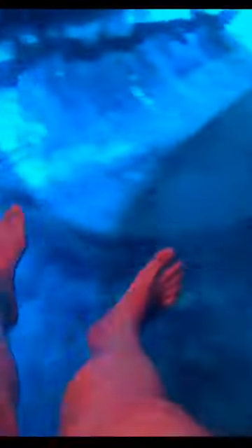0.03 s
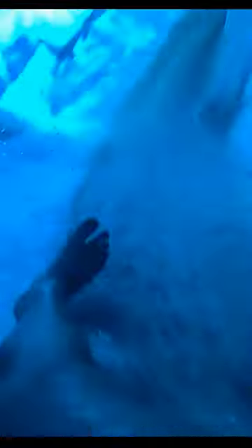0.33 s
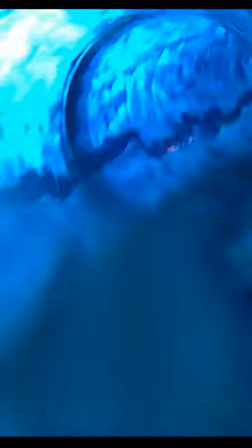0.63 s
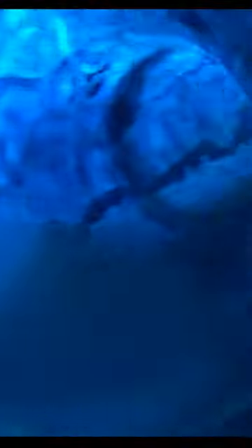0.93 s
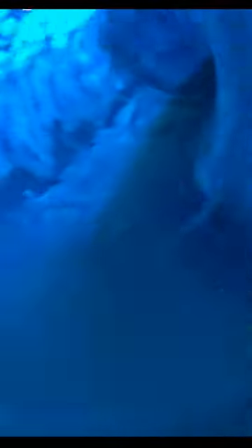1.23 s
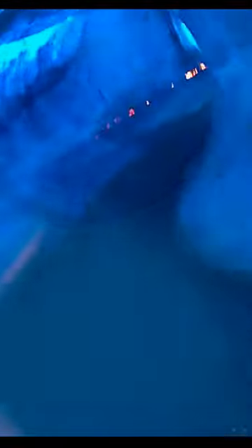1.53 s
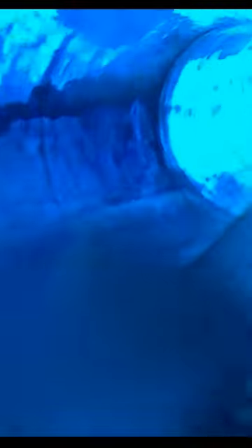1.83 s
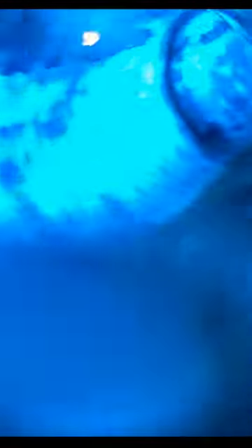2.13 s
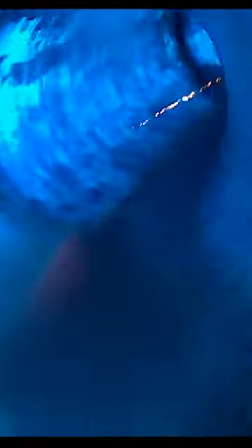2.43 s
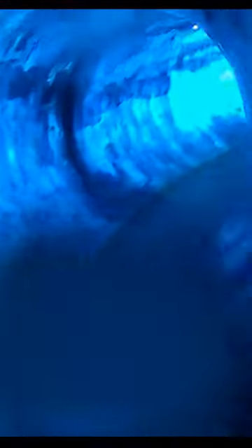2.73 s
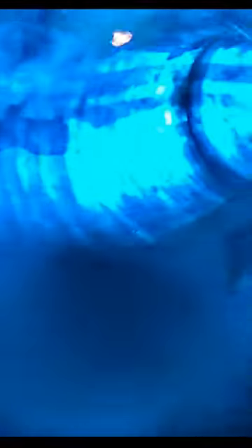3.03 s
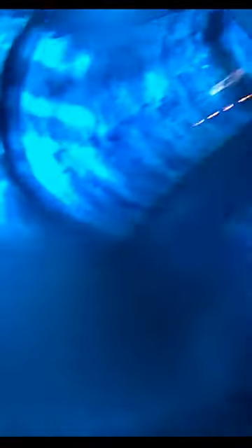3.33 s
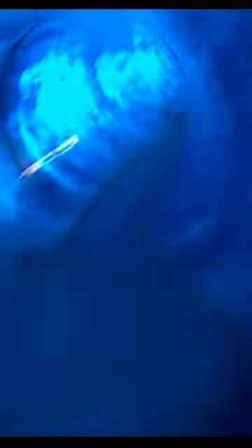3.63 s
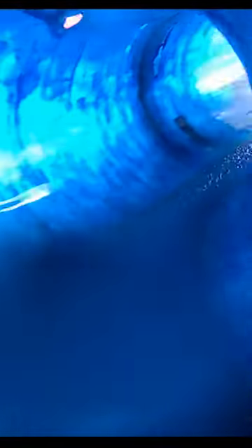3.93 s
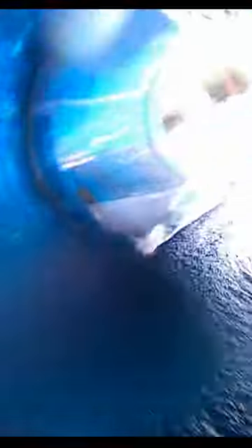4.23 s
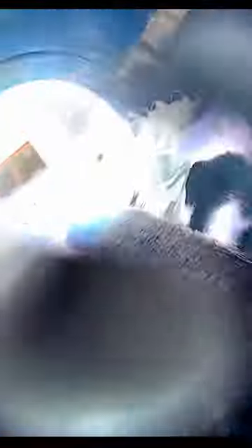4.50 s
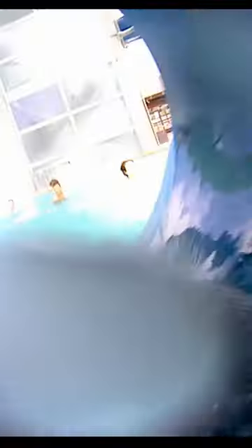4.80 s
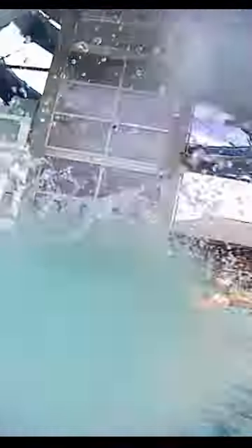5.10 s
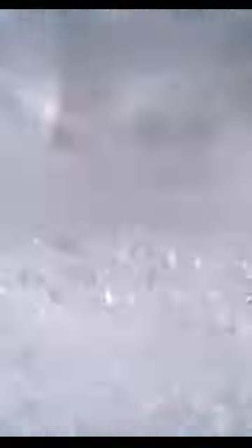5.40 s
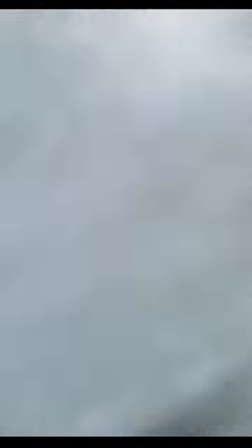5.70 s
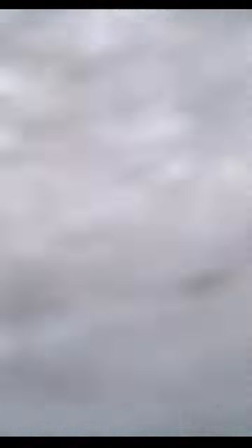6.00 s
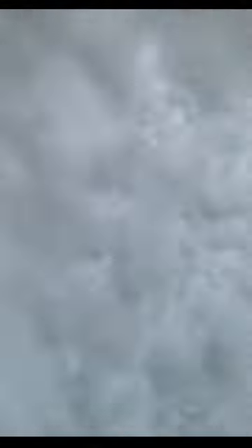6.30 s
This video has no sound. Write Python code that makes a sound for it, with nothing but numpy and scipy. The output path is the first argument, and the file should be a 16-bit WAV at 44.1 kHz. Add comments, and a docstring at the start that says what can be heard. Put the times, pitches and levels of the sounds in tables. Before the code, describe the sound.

From a microphone sealed in a watertight case at a rider's side, faint running water swells and sloshes through a tube slide, over a low rumble and occasional dull knocks. Drops spatter sharply on the case near the end. Then comes a far louder, slightly distorted plunge into a pool, as sheets of water slap the case, followed by fizzing foam, deep gurgling and close plopping bubbles. The treble is muffled throughout.

```python
"""Water hisses along a tube slide, heard at the rider's side from a camera in a watertight case.
The rider bumps along the wall, and drops tick on the case, thickest in the spray near the exit.
Then the plunge into the pool: sheets of water slam the case and overload the microphone inside,
foam fizzes all round it, and air dragged under water gurgles and plops close by."""
import sys
import numpy as np
from scipy import signal
from scipy.fft import rfft, irfft
from scipy.io import wavfile

SR = 44100
rng = np.random.default_rng(int(sys.argv[2]) if len(sys.argv) > 2 else 0)


def store_pcm(level_fs):
    """Save levels as 16-bit WAV."""
    pcm = np.round(np.clip(level_fs, -1, 1) * 32767).astype(np.int16)
    wavfile.write(sys.argv[1], SR, np.atleast_2d(pcm).T)


N = 288855
T = np.arange(N) / SR

# Bumps against the tube wall. Each row: time in seconds, peak in dB.
WALL_BUMPS = [(.2, -47), (0.632, -42), (1.039, -43), (1.462, -44.5), (1.67, -61), (1.905, -51.5),
              (2.03, -49), (2.8, -49), (3.229, -50), (4.122, -52)]
# The spectrum of a drop on the case. Each row: frequency in Hz, relative level in dB.
TAP_SPECTRUM = [(40, -28.5), (300, 0.5), (800, -3.5), (1300, 3.5), (1900, 2), (2700, -4), (3700, -7),
                (4400, -26)]
# The pool closes round the camera, at the surface and then right under. Each row: start in seconds,
# foam in dB, its fade in dB per second, gurgle in dB, its fade in dB per second (negative grows).
POOL_PLUNGES = [(5.259, -22, 31.5, -21.5, 38), (5.83, -17, 17.5, -19, -4)]
UNDER_S, CLOSE_S = 5.83, 0.025  # when the camera is dragged under; how long the water takes to close


def gain_of(db):
    """Decibels to amplitude."""
    return 10 ** (np.asarray(db) / 20)


def unit_rms(x):
    """Scales to an rms of one."""
    return x / np.sqrt(np.mean(x ** 2) + 1e-20)


def add(mix, start_s, sound):
    """Mixes a sound in from start_s on."""
    part = mix[max(round(start_s * SR), 0):][:len(sound)]
    part += sound[:len(part)]


def follow(curve):
    """The gain at every sample along a curve of seconds and dB."""
    return gain_of(np.interp(T, *np.transpose(curve)))


def colour(spectrum, modes=(), size=8192):
    """Minimum-phase impulse response of a spectrum with resonant lifts, heard inside the case."""
    hz = abs(np.fft.fftfreq(size, 1 / SR))
    point_hz, point_db = np.transpose(spectrum)
    db = np.interp(np.log(hz + 1), np.log(point_hz + 1), point_db)
    for centre, width, lift in modes:
        db += lift / (1 + (2 * (hz - centre) / width) ** 2)
    db -= np.clip((hz - 4500) / 25, 0, 60)  # the sealed case shuts out high treble
    log_response = np.conj(signal.hilbert(np.log(gain_of(db))))
    return np.fft.ifft(np.exp(log_response)).real[:size // 2]


def water(response, per_s, spread_db, smooth):
    """Countless small impacts of uneven size over a smooth wash, in one colour; rms one."""
    sizes = gain_of(spread_db * np.minimum(rng.exponential(1, N), 4)) * rng.choice([-1, 1], N)
    impacts = unit_rms(sizes * (rng.random(N) < per_s / SR))
    wash = smooth * rng.standard_normal(N)
    return unit_rms(signal.oaconvolve(impacts + wash, response)[:N])


def waver(per_s, depth_db):
    """A gain that wanders at random."""
    relative_rate = np.fft.rfftfreq(N, 1 / SR) / per_s
    drift = irfft(rfft(rng.standard_normal(N)) / (1 + relative_rate ** 4), N)
    return gain_of(depth_db * unit_rms(drift))


def tube_stream():
    """Running water hisses, patters and sloshes right against the ringing, shaking case."""
    # The stream swelling in the bends, its run-out into the pool, and the shaking of the carried case.
    # Each row: time in seconds, level in dB.
    rush = [(0, -53.5), (.25, -50), (.48, -49), (.75, -50), (1.09, -49), (1.18, -54.5), (1.43, -54),
            (1.75, -50.5), (2.04, -50.5), (2.15, -55.5), (2.47, -55), (2.85, -49.5), (2.94, -54.5),
            (3.05, -52.5), (3.3, -56), (3.85, -55), (4.2, -55), (4.47, -60.5)]
    runout = [(4.58, -57), (4.78, -50), (4.82, -44), (4.97, -43.5), (5.15, -39.5), (5.25, -35.5),
              (5.3, -26.5), (5.68, -31), (5.82, -24)]
    rumble = [(0, -54), (2.2, -55), (2.6, -59.5), (3.7, -61), (4.5, -60), (5.03, -56), (5.15, -41)]
    # Spectra of the hiss, slosh and shaking. Each row: frequency in Hz, relative level in dB.
    hiss_spectrum = [(200, -35.5), (600, -12.5), (1000, -6), (1250, -1.5), (1600, -5.5), (2200, -4.5),
                     (2700, -11.5), (3800, -14.5), (4400, -21.5)]
    slosh_spectrum = [(60, -5.5), (120, 1), (210, -1), (350, -5), (500, -4), (800, -5), (1100, -11.5),
                      (2000, -30)]
    shake_spectrum = [(8, -20.5), (22, 4.5), (40, -4), (70, -16), (120, -20.5), (300, -36), (1000, -98.5)]
    # Resonances of the case. Each row: centre in Hz, width in Hz, lift in dB.
    case_modes = [(1314, 170, 8), (1757, 150, 5.5), (2075, 47, 6.5), (3074, 56, 7), (3540, 710, 4)]
    spray_s, spray_rise_s = 4.95, 0.084  # the rider bursts out into flying spray
    swash_peak_s, drown_db_per_s = 0.06, 76
    spray = np.clip((T - spray_s) / spray_rise_s, 0, 1) * (T < POOL_PLUNGES[0][0] + CLOSE_S)
    ages = np.array([np.maximum(T - s, 0) / swash_peak_s for s, _ in WALL_BUMPS])
    swash = (ages * np.exp(1 - ages)).max(0)  # each bump throws the water about
    hiss = water(colour(hiss_spectrum, case_modes), per_s=2500, spread_db=3, smooth=1)
    hiss *= gain_of(-0.85) * waver(per_s=17, depth_db=1.24)
    patter = water(colour(TAP_SPECTRUM), per_s=90, spread_db=3, smooth=0)
    patter *= gain_of(-14.5 + 6.5 * spray)
    slosh = water(colour(slosh_spectrum), per_s=600, spread_db=4.5, smooth=1)
    slosh *= gain_of(-12.5 + 3 * swash + 4 * spray)
    shake = follow(rumble) * water(colour(shake_spectrum), per_s=150, spread_db=8, smooth=1.1)
    drowned = gain_of(-drown_db_per_s * np.maximum(T - UNDER_S, 0))  # all fades once under water
    return drowned * (follow(rush + runout) * (hiss + patter + slosh) + shake)


def swing(centre_s, db, hz):
    """One swing of pressure, up and then down."""
    phase = np.clip(2 * np.pi * hz * (T - centre_s), -8, 8)
    return -gain_of(db) * phase * np.exp((1 - phase ** 2) / 2)


def thumps():
    """The wall of the tube bumps the case, and later the pool shoves it."""
    # Dull pushes of the pool. Each row: time in seconds, peak in dB, frequency in Hz.
    shoves = [(5.295, -14.5, 45), (5.335, -16, 40), (5.555, -9, 44), (5.7142, -5.5, 48.4), (5.769, -7, 80),
              (5.79, -11.5, 55), (5.88, -9, 60), (5.951, -6.5, 54), (6.259, -14, 100), (6.418, -15.5, 130)]
    wall = sum(swing(s, db, hz=34.2) for s, db in WALL_BUMPS)
    return wall + sum(swing(*shove) for shove in shoves)


def drops():
    """Each drop ticks on the case, right by the microphone, and spatters for a few milliseconds."""
    # The largest single drops. Each row: start in seconds, peak in dB.
    landings = [(0.371, -33.5), (0.4566, -30), (0.5013, -31.5), (1.059, -37), (1.724, -36), (2.0358, -32.5),
                (3.02, -39.5), (3.46, -44), (3.627, -43), (5.0269, -19), (5.043, -19.5), (5.079, -21.5),
                (5.085, -23), (5.1085, -22.5), (5.134, -25), (5.1579, -17), (5.179, -18.5)]
    out, t = np.zeros(N), np.arange(800) / SR
    tap = colour(TAP_SPECTRUM)
    for start_s, db in landings:
        hit = 0.17 * rng.standard_normal(len(t)) * np.exp(-t / 0.003)
        hit[0] = 1  # the impact, ahead of its spatter
        tick = signal.fftconvolve(hit, tap)
        add(out, start_s, gain_of(db) * tick / abs(tick).max())
    return out


def surge(start_s, db, fade_db_per_s):
    """A gain that swells as the water closes, then changes at a steady rate in dB."""
    age = np.maximum(T - start_s, 0)
    return np.minimum(age / CLOSE_S, 1) * gain_of(db - fade_db_per_s * age)


def pool():
    """At each plunge foam fizzes round the case while air dragged under breaks into gurgling bubbles."""
    # Spectra of the foam and the gurgle. Each row: frequency in Hz, relative level in dB.
    foam_spectrum = [(200, -29.5), (700, -2), (1250, 3.5), (1550, -0.5), (1900, 5.5), (2600, -6.5),
                     (3600, -7.5), (4400, -28)]
    gurgle_spectrum = [(12, -40), (35, -5.5), (110, 5), (250, -1), (450, -5.5), (720, -4), (1000, -12.5),
                       (1600, -31.5), (4000, -56.5)]
    foam = water(colour(foam_spectrum), per_s=900, spread_db=3.5, smooth=0.89)
    foam *= waver(per_s=20, depth_db=1.5)
    foam += 0.6 * swarm(low_hz=1000, high_hz=3900, cycles=50, count=70)
    gurgle = water(colour(gurgle_spectrum), per_s=500, spread_db=2, smooth=0.68)
    gurgle *= waver(per_s=31, depth_db=0.4)
    gurgle += 0.75 * swarm(low_hz=210, high_hz=950, cycles=26, count=44)
    return sum(foam * surge(s, foam_db, foam_fade) + gurgle * surge(s, gurgle_db, gurgle_fade)
               for s, foam_db, foam_fade, gurgle_db, gurgle_fade in POOL_PLUNGES)


def sheets():
    """Each sheet of water slaps the case, breaks into a dense burst of impacts, and stops quickly."""
    # Sheets striking the case. Each row: start and length in seconds, level in dB, slosh in dB above it.
    strikes = [(5.274, 0.0094, -24, 0.5), (5.291, 0.022, -12, -8), (5.32, .01, -13.5, -14),
               (5.334, 0.016, -8.5, -5.5), (5.362, 0.025, -16.5, -4), (5.394, 0.021, -15.5, -5),
               (5.423, 0.0061, -9, -5.5), (5.465, 0.011, -11, -10.5), (5.478, .027, -9, 2),
               (5.508, 0.061, -11, 0), (5.583, 0.0041, -7, -3.5), (5.609, 0.013, -23.5, -10),
               (5.718, .006, -22, 4.5), (5.745, 0.0055, -27, 10.5), (5.7707, 0.0068, -19, 6),
               (5.827, 0.017, -9, -14.5), (5.877, 0.044, -14, 5.5), (5.94, 0.044, -12, 0),
               (5.993, 0.022, -17.5, -3), (6.067, 0.051, -15, 0.5), (6.127, 0.0094, -17.5, 10.5),
               (6.156, 0.0022, -17.5, 6), (6.2215, 0.0025, -11, 4), (6.253, .012, -18.5, -1.5),
               (6.306, 0.0092, -20, 3)]
    # Spectra of the bright splash and low slosh. Each row: frequency in Hz, relative level in dB.
    splash_spectrum = [(150, -8.5), (600, -8.5), (1100, 1.5), (1500, 1.5), (1850, 5), (2300, -3),
                       (2750, -6.5), (3600, -5), (4400, -23.5)]
    slosh_spectrum = [(8, -32), (25, 5), (65, 2), (110, -0.5), (190, -1.5), (370, 1), (600, -4.5),
                      (900, -6.5), (1400, -22), (3000, -49.5)]
    splash_power, slosh_power = np.zeros(N), np.zeros(N)
    for start_s, length_s, db, slosh_db in strikes:
        t = np.arange(int((length_s + 0.05) * SR)) / SR
        slap = 1 + 0.73 * np.exp(-t / 0.0025)
        attack = 1 - np.exp(-t / 0.00073)
        release = np.exp(-np.maximum(t - length_s, 0) / 0.0032)
        power = slap * attack * release
        add(splash_power, start_s, gain_of(db) ** 2 * power)
        add(slosh_power, start_s, gain_of(db + slosh_db) ** 2 * power)
    splash = water(colour(splash_spectrum), per_s=3000, spread_db=3, smooth=0.53)
    slosh = water(colour(slosh_spectrum), per_s=1000, spread_db=3.5, smooth=0.5)
    return np.sqrt(splash_power) * splash + np.sqrt(slosh_power) * slosh


def bubble(hz, t60, rise, onset):
    """An air pocket swells into its note, then dies while its pitch climbs."""
    age = np.arange(int(max(t60, 0.003) * SR)) / SR / t60  # age and onset are fractions of t60
    swell = 1 - np.exp(-(age / onset) ** 2)
    shape = swell * gain_of(-60 * age)
    return shape / shape.max() * np.sin(2 * np.pi * hz * t60 * (age + rise * age ** 2 / 2))


def air_pockets():
    """Large air pockets plop close to the microphone, the low ones ringing longest."""
    # The largest pockets. Each row: start in seconds, pitch in Hz, peak in dB.
    plops = [(5.3091, 1206, -5.5), (5.3482, 1028, -5.5), (5.3943, 1073, -7.5), (5.4261, 1854, -2),
             (5.4669, 1825, -11), (5.4805, 1940, -9.5), (5.5234, 1983, -3.5), (5.8319, 1310, -4),
             (5.8896, 1720, -13), (5.942, 1890, -8.5), (5.9473, 373, -11), (6.0137, 782, -9),
             (6.096, 2304, -6), (6.0982, 371, -10), (6.1256, 760, -11), (6.2062, 326, -12),
             (6.22, 1158, -2), (6.2489, 1716, -8.5), (6.2596, 3630, -16), (6.2703, 830, -12),
             (6.3028, 503, -8.5), (6.3123, 1990, -7), (6.313, 582, -8), (6.3392, 341, -15.5),
             (6.3664, 1885, -10), (6.4358, 490, -7.5), (6.459, 1950, -15.5), (6.4896, 1790, -16),
             (6.514, 213, -11.5), (6.5301, 684, -9)]
    out = np.zeros(N)
    for start_s, hz, db in plops:
        t60 = 0.031 * (1010 / hz) ** 0.73
        add(out, start_s, gain_of(db) * bubble(hz, t60, rise=0.035, onset=0.14))
    return out


def swarm(low_hz, high_hz, cycles, count):
    """Small bubbles ring at random moments once the camera is under water; rms one there."""
    out = np.zeros(N)
    for k, (when, pitch, size, ring) in enumerate(rng.random((count, 4))):
        hz = low_hz * (high_hz / low_hz) ** pitch
        note = bubble(hz, t60=cycles * (0.5 + ring) / hz, rise=0.12, onset=0.068)
        start_s = UNDER_S + (k + when) / count * (T[-1] - UNDER_S)
        add(out, start_s, gain_of(10 * size) * note)
    return out / np.std(out[T > UNDER_S])


def scene():
    """The ride down the tube, then the plunge into the pool, in mono."""
    return (tube_stream() + thumps() + drops() + sheets() + pool() + air_pockets())[None]


def record(dry):
    """The microphone saturates, a narrow band muffles it, and the peaks overload once more."""
    knee, headroom = 0.74, 0.23  # amplitude where the second overload begins, and the room above it
    muffle_hz, edge_hz = 4206, 15900
    muffle = signal.firwin(161, muffle_hz, window=("kaiser", 7), fs=SR)
    band_edge = signal.firwin(511, edge_hz, window=("kaiser", 9), fs=SR)
    saturated = dry / (1 + (dry / 0.85) ** 6) ** (1 / 6)
    muffled = signal.oaconvolve(saturated, muffle[None], "same")
    excess = muffled - np.clip(muffled, -knee, knee)
    clipped = muffled - excess + headroom * np.tanh(0.34 * excess / headroom)
    return signal.oaconvolve(clipped, band_edge[None], "same")


dry = scene()
out = record(dry)
store_pcm(out)
```